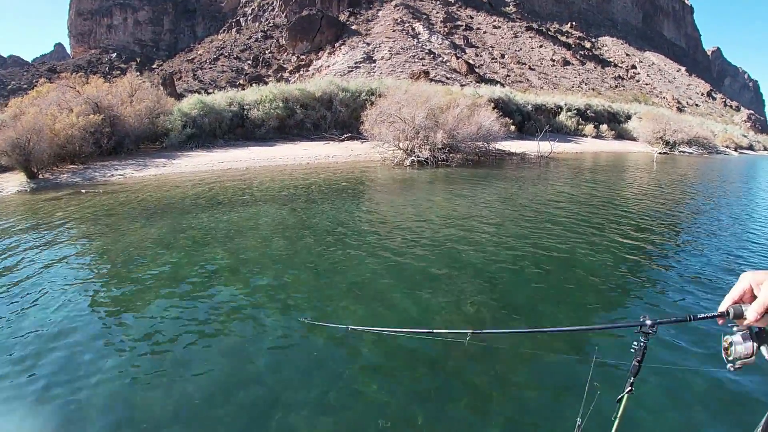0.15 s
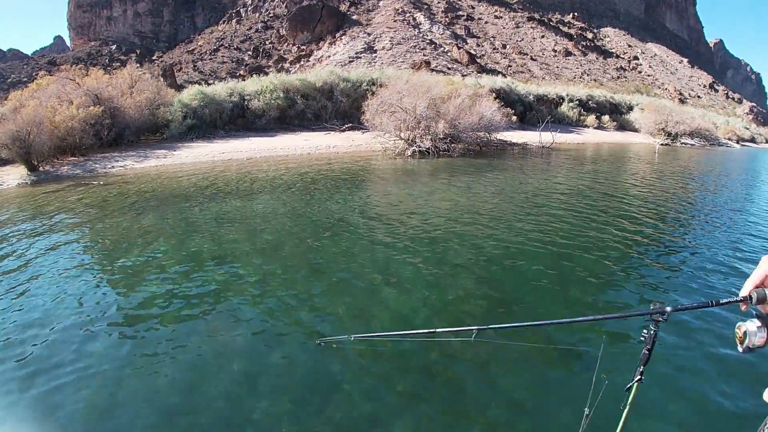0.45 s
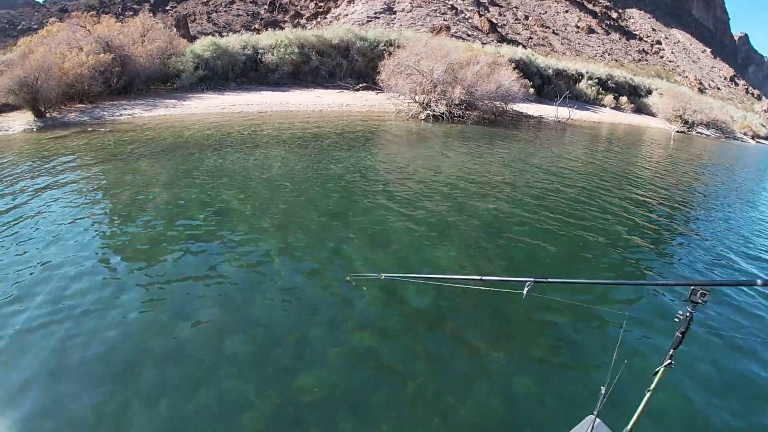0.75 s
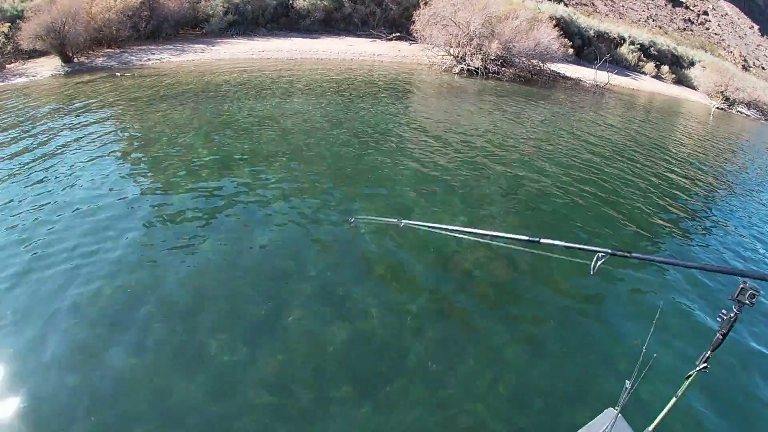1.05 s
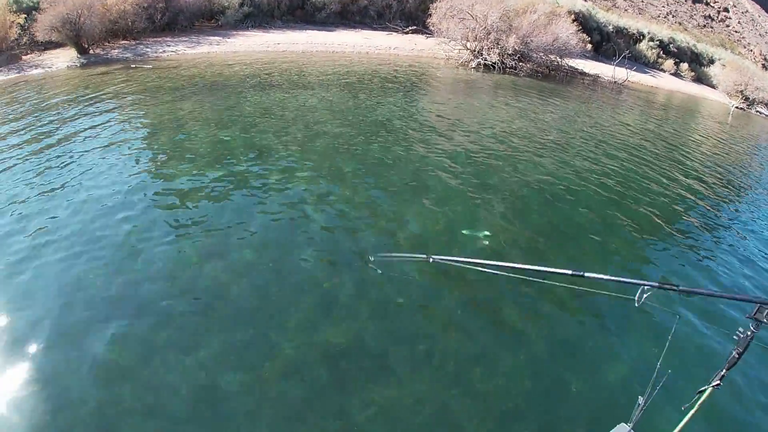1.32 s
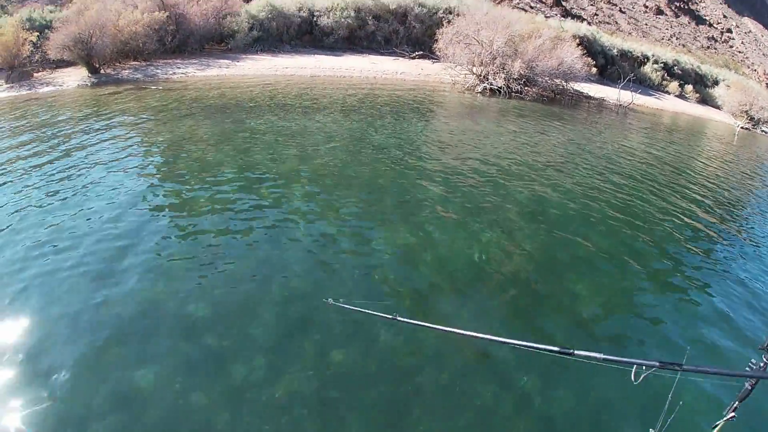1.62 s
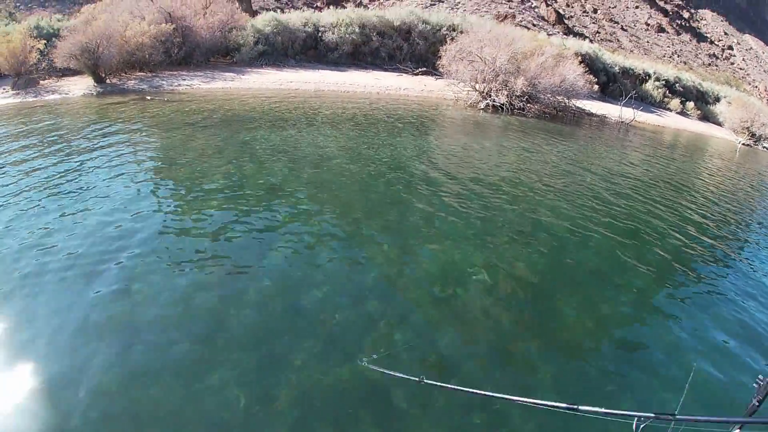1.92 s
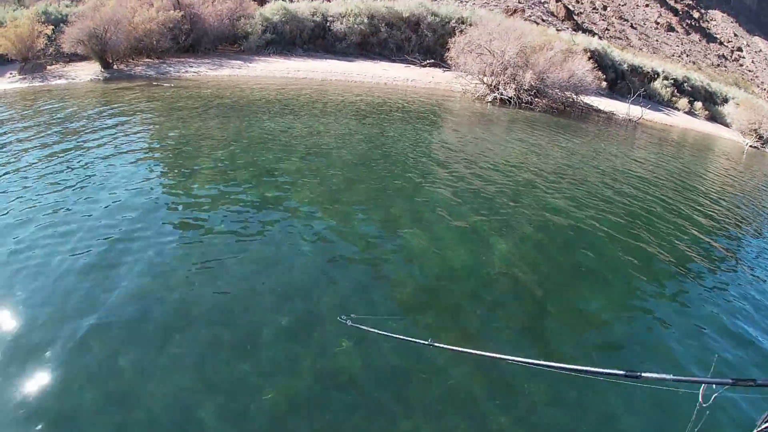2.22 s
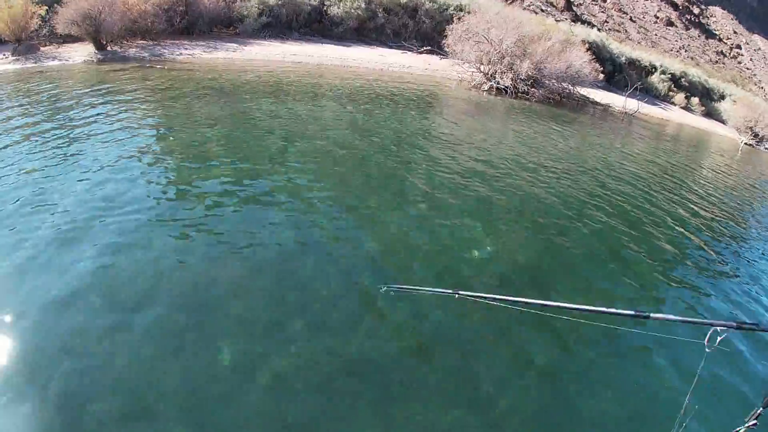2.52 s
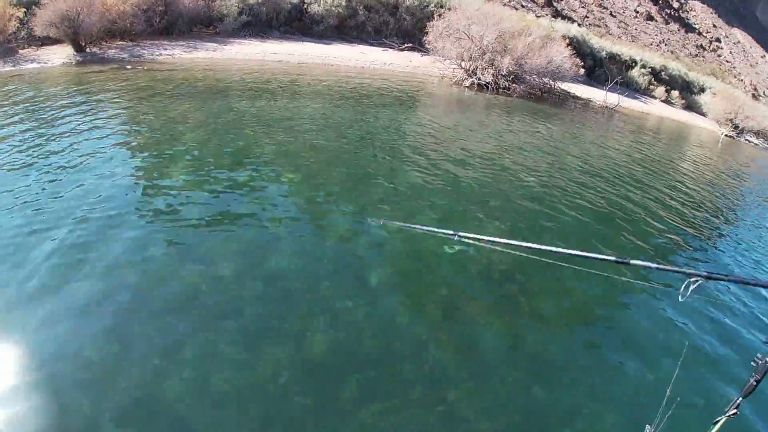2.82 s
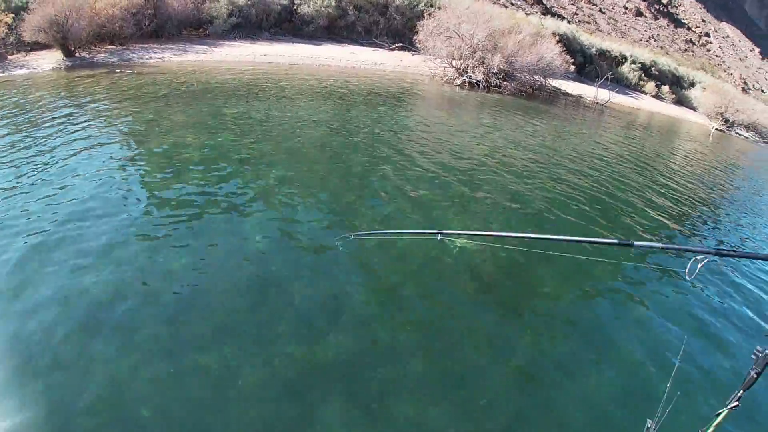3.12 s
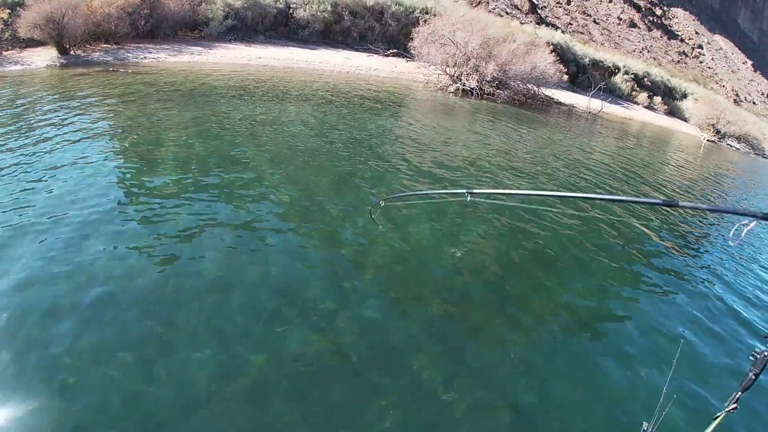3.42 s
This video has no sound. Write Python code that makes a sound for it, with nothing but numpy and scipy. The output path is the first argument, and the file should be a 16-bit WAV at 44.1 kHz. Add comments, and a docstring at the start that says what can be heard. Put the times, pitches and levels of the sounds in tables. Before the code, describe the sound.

Close on a small boat, a hooked fish pulls line from a reel: rapid high clicks fuse into a fluctuating buzz over faint line whirr, soft hiss and low wind, with thuds and one late hollow knock.

```python
"""A fish pulls line off a spinning reel on a small boat. Throughout, the drag's spring clicks over twelve teeth
of the spool, up to about 250 times a second: each click is a noise crack plus decaying spool modes.
The running line whirrs (resonant noise) amid buffeting wind, hull rumble, soft outdoor hiss and faint hum
(shaped noise). Blunt thuds, decaying sines, fall near 0.83, 1.1, 1.36 and 3.26 s; at 3.28 s a hollow knock
on the hull starts with a snap of noise and rings nine modes."""
import sys
import numpy as np
from scipy import signal
from scipy.io import wavfile

SR = 44100
rng = np.random.default_rng(int(sys.argv[2]) if len(sys.argv) > 2 else 0)


def invert_db(level):
    """Linear amplitude ratio for a level in decibels (20 dB per decade), elementwise."""
    return 10 ** (np.asarray(level, dtype=float) / 20)


def put_to_file(sound):
    """Save the sound as 16-bit audio at rate SR, in the file named by the first command-line argument."""
    columns = np.atleast_2d(sound).T  # one column per channel
    safe = np.clip(columns, -1, 1)
    whole_steps = np.round(safe * 32767)
    wavfile.write(sys.argv[1], SR, whole_steps.astype(np.int16))


N = 156555  # samples

# The twelve spool teeth. Each row: lateness in tooth spacings, then offsets in dB of main ring, crack,
# crack below 6 kHz, deepest ring, lower rings.
TEETH = [(0.2, 4.6, 1.6, -3, -3, 2.5), (0.2, 1.7, 0, 1, 4, 2.5), (0.2, 1.7, 1.2, -.5, -3, -3),
         (0.17, 3, 1, .7, 0, -1.5), (0.12, -.6, 0.2, 2, 1, -.5), (0.07, -1, -2.6, 5, 0, 0),
         (0.06, -1.8, -2.6, 2, 2.5, 1), (0.11, .8, -0.2, -.5, 1.5, 1), (0.18, -.5, .8, -.7, .5, -4),
         (0.21, -5.5, 1.2, -2, -3, -1), (0.21, -4.5, .6, -2, -1, .5), (0.21, 1.2, -0.5, -1, -1, 2.5)]
# Click strength over time. Each row: time in seconds, main ring in dB, crack in dB, lower rings in dB,
# crack below 6 kHz in relative dB, crack above 9.5 kHz in relative dB.
CLICKS = [(0.0, -73, -61.5, -48.5, -16, 15), (0.05, -56, -50, -52, 5, 9.5), (0.24, -42, -42.5, -45, 0, 6),
          (0.43, -54, -52.5, -50.5, 6.5, 10), (0.53, -43, -46.5, -43.5, 6, 9),
          (1.0, -34.5, -38.5, -43, -3.5, 0), (1.18, -32, -41.5, -37, 0, 4), (1.3, -35, -39, -46, 0, 2),
          (1.5, -32, -36, -44, -4, 1), (1.79, -40, -45, -47, 5.5, 7), (1.81, -29.5, -37.5, -43, 1.5, 3),
          (2.04, -36, -39.5, -52, -1.5, 5), (2.17, -31.5, -37.5, -44, -2.5, 2.5),
          (2.34, -36, -42, -49, 2, 2.5), (2.86, -29.5, -34, -43.5, -4, 0.5),
          (2.96, -33.5, -44, -47.5, 4.5, 4.5), (3.12, -30.5, -37.5, -46, -2, -1),
          (3.52, -35.5, -40.5, -44.5, -1, 0)]
CLICK_SAMPLES, BUMP_SAMPLES = 900, 6000
NEXT_MEMORY = .75  # carry-over from one click to the next


def evened(x):
    """Scales to rms 1."""
    return x / np.sqrt(np.mean(x ** 2) + 1e-20)


def curve(table, t, order=1):
    """Interpolates one column of a time table."""
    rows = np.array(table)
    return np.interp(t, rows[:, 0], rows[:, order])


def colour(x, tone):
    """Causal minimum-phase filter from rows of frequency in Hz, gain in dB."""
    f, db = np.transpose(tone)
    hz = np.abs(np.fft.fftfreq(8192, 1 / SR))
    gain_db = np.maximum(np.interp(np.log(hz + 1), np.log(f + 1), db), -100)
    log_gain = np.log(invert_db(gain_db))
    taps = np.fft.ifft(np.exp(log_gain - 1j * signal.hilbert(log_gain).imag)).real
    return signal.oaconvolve(x, taps)[:N]


def slow(cutoff_hz):
    """Slow random wander of rms 1: low-passed noise."""
    lowpass = signal.butter(2, cutoff_hz, fs=SR, output="sos")
    return evened(signal.sosfilt(lowpass, rng.standard_normal(N)))


def fuzzy(hz, pole_width_hz):
    """Noise of rms 1 through one resonant pole, applied twice."""
    turn = np.exp(2j * np.pi * hz * np.arange(N) / SR)
    r = np.exp(-np.pi * pole_width_hz / SR)
    x = rng.standard_normal(N) / turn  # filtered around 0 Hz, then shifted up
    return evened((turn * signal.lfilter([1], np.convolve([1, -r], [1, -r]), x)).real)


def lay(times, sounds):
    """Adds one row of sound at each time in seconds."""
    starts = np.round(np.clip(times, 0, N / SR) * SR).astype(int)
    at = starts[:, None] + np.arange(sounds.shape[1])
    return np.bincount(at.ravel(), sounds.ravel(), N + sounds.shape[1])[:N]


def alike(shape, next_memory=0):
    """Chance per click that a tooth remembers from its last turn, and perhaps from the click before."""
    tooth_memory = .75
    turn = np.append(np.eye(len(TEETH))[0], -tooth_memory)
    poles = np.convolve(turn, [1, -next_memory])
    return evened(signal.lfilter([1], poles, rng.standard_normal(shape), axis=0))


def drag():
    """Clicks fall where the spool passes a tooth; each is a crack of noise plus the ringing spool."""
    # Each row: time in seconds, spool speed in teeth per second.
    spool_speed = [(0.0, 33.7), (0.08, 98.7), (0.23, 144.1), (0.29, 134.8), (0.32, 89.5), (0.36, 89.1),
                   (0.44, 54.0), (0.53, 213.6), (0.6, 204.9), (0.68, 198.5), (0.72, 143.8), (0.84, 195.2),
                   (0.87, 213.8), (1.0, 181.9), (1.04, 160.4), (1.09, 181.3), (1.12, 205.3), (1.25, 221.5),
                   (1.28, 187.2), (1.34, 207.3), (1.39, 178.7), (1.48, 160.8), (1.51, 204.6), (1.61, 161.8),
                   (1.65, 155.6), (1.71, 88.2), (1.74, 100.5), (1.83, 213.6), (1.94, 231.8), (2.0, 182.6),
                   (2.05, 124.2), (2.15, 213.4), (2.27, 183.7), (2.35, 108.1), (2.43, 182.3), (2.5, 200.1),
                   (2.68, 170.7), (2.74, 213.4), (2.78, 247.3), (2.87, 238.2), (2.93, 205.9), (2.97, 119.0),
                   (3.01, 155.7), (3.08, 231.5), (3.2, 192.4), (3.28, 104.0), (3.35, 176.8), (3.38, 166.6),
                   (3.5, 183.8), (3.55, 128.2)]
    lead_s, crack_spread_db = .0005, 1.3
    t = np.arange(N) / SR
    passed = np.cumsum(curve(spool_speed, t)) / SR
    k = np.arange(int(passed[-1]))
    teeth = np.array(TEETH)[k % len(TEETH)].T
    late, crack_db = teeth[0], teeth[2]
    when = np.interp(k + late, passed, t) - lead_s
    share_db = -10 * np.log10(curve(spool_speed, when) / 200)  # faster clicks are each weaker
    size_db = curve(CLICKS, when, order=2) + share_db + crack_db + crack_spread_db * alike(len(k))
    ringing = spool_rings(when, share_db, teeth, size_db)
    crack, side = cracks(when, size_db, teeth[3])
    return lay(when, ringing) + crack, side


def rings(modes, count, spread_db, detune):
    """Every click rings the modes; strength and tuning cling to the tooth, the phase drifts."""
    phase_turns, rise_s = .17, 0.00019
    t, out = np.arange(CLICK_SAMPLES) / SR, np.zeros((count, CLICK_SAMPLES))
    for hz, db, t60 in modes:
        size, tune = alike((count, 2)).T[:, :, None]
        phase = phase_turns * alike((count, 1), NEXT_MEMORY)
        decay = invert_db(db + spread_db * size - 60 * t / t60)
        out += decay * np.sin(2 * np.pi * (hz * (1 + detune * tune) * t + phase))
    return out * (1 - np.exp(-t / rise_s))


def spool_rings(when, share_db, teeth, size_db):
    """Spool modes per click: main, lower and deepest rings, and upper rings that follow the crack."""
    # Four mode tables. Each row: nominal frequency in Hz, relative level in dB, t60 in seconds.
    main_modes = [(6359, 0, 0.027), (6274, -5.5, 0.015), (6383, -6, 0.014)]
    lower_modes = [(4554, -2.5, 0.022), (4753, 0.5, 0.02), (5250, 2.5, 0.013), (5720, 6, 0.0086)]
    deepest_modes = [(4000, -5.5, 0.027)]
    upper_modes = [(7370, -3, 0.0067), (7760, 3, 0.0092), (8350, -5.5, 0.0091), (10230, -10.5, 0.009)]
    # Deepest ring coming and going. Each row: time in seconds, relative level in dB.
    deepest_level = [(0.3, -1.5), (1.15, -6.5), (2.2, 5), (2.7, -.5), (3.5, 1.5)]
    main_gain_db, lower_gain_db = 6.5, 5.5
    spread_db, detune = 3, 0.011  # all but the main ring
    count = len(when)
    main_db, deep_db, lower_db = teeth[[1, 4, 5]]
    main_db = curve(CLICKS, when) + share_db + main_db + main_gain_db
    main = invert_db(main_db)[:, None] * rings(main_modes, count, 2, 0.0042)
    lower = invert_db(lower_db)[:, None] * rings(lower_modes, count, spread_db, detune)
    deep_db = deep_db + curve(deepest_level, when)
    deepest = invert_db(deep_db)[:, None] * rings(deepest_modes, count, spread_db, detune)
    body_db = curve(CLICKS, when, order=3) + share_db + lower_gain_db
    body = invert_db(body_db)[:, None] * (lower + deepest)
    upper = invert_db(size_db)[:, None] * rings(upper_modes, count, spread_db, detune)
    return main + body + upper


def cracks(when, size_db, low_db):
    """Noise bursts, fast decay plus slower rattle, levelled in three bands; also a high side signal."""
    # Each row: frequency in Hz, filter gain in dB.
    crack_tone = [(1000, -51), (1800, -18.5), (3000, -14.5), (3900, -13.5), (4300, -22), (5200, -13),
                  (6800, -3), (8600, -11), (10500, -22), (11300, -30), (13000, -33.5), (16000, -39.5)]
    gain_db, rise_s, t60_s = 26, .0002, .0055
    rattle_db, rattle_t60_s = -11, 0.031
    split_hz, side_hz = (6000, 9500), 11600
    side_db, crack_share = -4, 0.24  # side signal: level of its independent noise; share copied from the crack
    t = np.arange(N) / SR
    age = t[:CLICK_SAMPLES]
    decay = invert_db(-60 * age / t60_s) + invert_db(rattle_db - 60 * age / rattle_t60_s)
    burst = decay * np.minimum(age / rise_s, 1)
    bursts = burst * alike((len(when), 2, CLICK_SAMPLES), NEXT_MEMORY)
    bursts = bursts * np.linalg.norm(burst) / np.linalg.norm(bursts, axis=2, keepdims=True)  # equal energy
    gain = invert_db(size_db + gain_db)[:, None]
    crack, other = [colour(lay(when, gain * b), crack_tone) for b in bursts.swapaxes(0, 1)]
    low, below = [signal.oaconvolve(crack, signal.firwin(255, hz, fs=SR), "same") for hz in split_hz]
    treble = invert_db(curve(CLICKS, t, order=5))
    highpass = signal.firwin(255, side_hz, pass_zero=False, fs=SR)
    side = treble * signal.oaconvolve(invert_db(side_db) * other + crack_share * crack, highpass, "same")
    latest = np.searchsorted(when, t) - 1
    low_gain = invert_db(curve(CLICKS, t, order=4) + low_db[latest])
    return low_gain * low + below - low + treble * (crack - below), side


def line_whirr():
    """Running line: patchy noise in one resonance."""
    # Each row: time in seconds, mean level in dB.
    whirr_level = [(0.0, -51), (0.4, -60.5), (0.71, -48.5), (0.92, -55), (1.48, -51), (2.3, -52.5),
                   (2.63, -55.5), (3.17, -49), (3.3, -61.5), (3.55, -50.5)]
    level_db = curve(whirr_level, np.arange(N) / SR) + 1.5 * slow(22.0)
    return invert_db(level_db) * fuzzy(1600, 320)


def thuds():
    """Blunt thuds: decaying sines."""
    # Each row: start in seconds, level in dB, frequency in Hz, t60 in seconds.
    thud_rows = [(0.825, -24.5, 213, 0.029), (0.836, -27.5, 79.5, 0.12), (1.095, -39, 200, 0.1),
                 (1.358, -38.5, 265, 0.096), (3.261, -42, 388, 0.13)]
    t = np.arange(BUMP_SAMPLES) / SR
    start_s, db, hz, t60 = np.array(thud_rows).T[:, :, None]
    return lay(start_s[:, 0], invert_db(db - 60 * t / t60) * np.sin(2 * np.pi * hz * t))


def knock():
    """Hollow hull knock: decaying modes of alternating sign plus a snap of noise."""
    # Each row: frequency in Hz, relative level in dB, t60 in seconds.
    knock_modes = [(400, -19, .14), (597, 1.5, 0.052), (874, -7.5, 0.09), (1040, -11, 0.033),
                   (1177, -4, 0.061), (1297, 2.5, 0.06), (1475, -7, 0.033), (1940, -7, 0.023),
                   (2950, -19, 0.034)]
    # Each row: frequency in Hz, relative filter gain in dB.
    snap_tone = [(200, -19), (500, 2), (3500, -8.5), (6000, -50)]
    start_s, knock_db, rise_s = 3.2848, -23.5, 0.00059
    snap_db, snap_t60_s = -32, .07
    t = np.arange(BUMP_SAMPLES) / SR
    sound = np.zeros(BUMP_SAMPLES)
    for k, (hz, db, t60) in enumerate(knock_modes):
        sound += (-1) ** k * invert_db(knock_db + db - 60 * t / t60) * np.sin(2 * np.pi * hz * t)
    snap = evened(colour(rng.standard_normal(BUMP_SAMPLES), snap_tone)[:BUMP_SAMPLES])
    sound += invert_db(snap_db - 60 * t / snap_t60_s) * snap
    return lay([start_s], (sound * np.minimum(t / rise_s, 1))[None])


def shaped_noise(level, tone, lift_db, wander_db, wander_hz):
    """Coloured noise at a drawn level with random wander in dB."""
    level_db = curve(level, np.arange(N) / SR) + lift_db + wander_db * slow(wander_hz)
    return invert_db(level_db) * evened(colour(rng.standard_normal(N), tone))


def wind():
    """Light wind buffeting the microphone: gusting low noise."""
    # Each row: time in seconds, mean level in dB.
    wind_level = [(0.0, -77), (0.1, -54), (0.38, -72), (0.93, -51), (1.67, -65), (1.88, -87), (2.26, -36),
                  (2.59, -71), (2.74, -43), (2.9, -74), (3.1, -43), (3.21, -64), (3.3, -36.5), (3.55, -65)]
    # Each row: frequency in Hz, relative filter gain in dB.
    wind_tone = [(15, -12), (32, 0), (50, -4), (80, -15.5), (200, -30.5), (1000, -102)]
    return shaped_noise(wind_level, wind_tone, 0, 2.6, 21)


def hull_rumble():
    """Rumble through the hull: wandering low noise."""
    # Each row: time in seconds, level in dB before lift and wander.
    rumble_level = [(0.0, -61), (0.27, -65.5), (0.6, -55.5), (1.76, -61), (2.33, -59.5), (2.6, -63.5),
                    (3.55, -59)]
    # Each row: frequency in Hz, relative filter gain in dB.
    rumble_tone = [(40, -28.5), (70, -4), (125, -9.5), (175, 1), (300, -5.5), (800, -55.5)]
    return shaped_noise(rumble_level, rumble_tone, 1.0, 2.6, 12.7)


def outdoor_hiss():
    """Soft outdoor hiss: wandering broadband noise."""
    # Each row: time in seconds, level in dB before lift and wander.
    hiss_level = [(0.0, -53.5), (0.4, -58.5), (0.7, -51), (0.9, -57), (1.6, -54.5), (1.88, -59),
                  (2.28, -53.5), (2.6, -61.5), (2.96, -56.5), (3.55, -60)]
    # Each row: frequency in Hz, relative filter gain in dB.
    hiss_tone = [(150, -31.5), (300, -4.5), (600, -7), (1300, -4.5), (2500, -11.5), (5000, -15.5),
                 (16000, -44)]
    return shaped_noise(hiss_level, hiss_tone, 4.5, 1.9, 16)


def hum():
    """Faint hum: noise in a narrow resonance."""
    # Each row: frequency in Hz, pole width in Hz, level in dB.
    hum_rows = [(86.9, 8.3, -64)]
    return sum(invert_db(db) * fuzzy(hz, width_hz) for hz, width_hz, db in hum_rows)


def scene():
    """Mono scene, plus a side signal above about 11.6 kHz that follows the clicks."""
    reel, side = drag()
    background = wind() + hull_rumble() + outdoor_hiss() + hum()
    mid = reel + line_whirr() + thuds() + knock() + background
    return np.array([mid + side, mid - side])


def roll_off(x):
    """The treble ends steeply here."""
    return signal.sosfilt(signal.butter(12, 16500, fs=SR, output="sos"), x)


def record(dry):
    """Band limit by a steep linear-phase low-pass."""
    edge_hz = 15950
    lowpass = signal.firwin(511, edge_hz, window=("kaiser", 9), fs=SR)[None]
    return roll_off(signal.oaconvolve(dry, lowpass, "same"))


dry = scene()
out = record(dry)
put_to_file(out)
```